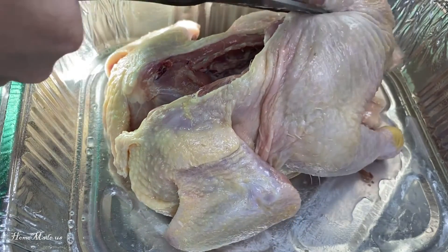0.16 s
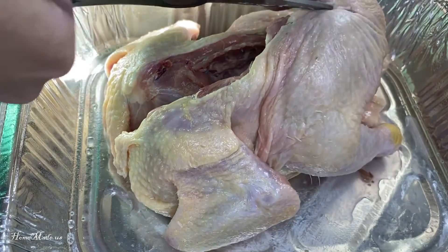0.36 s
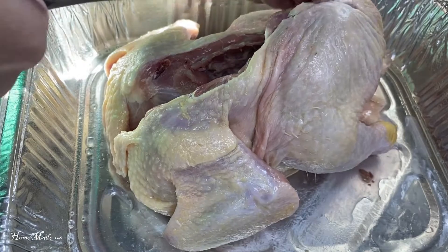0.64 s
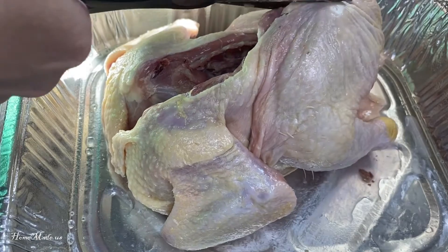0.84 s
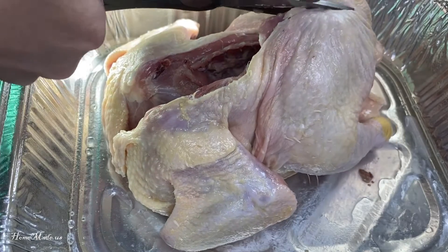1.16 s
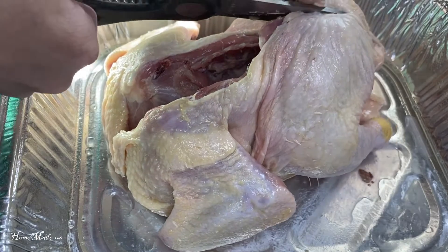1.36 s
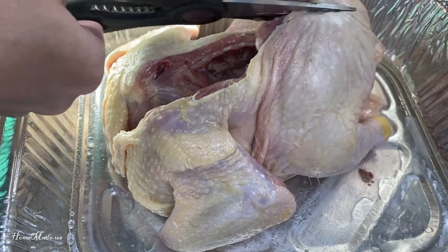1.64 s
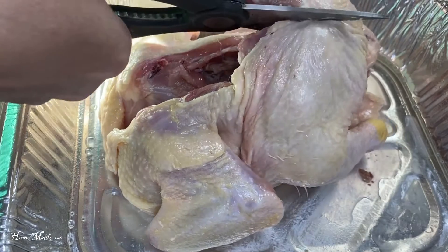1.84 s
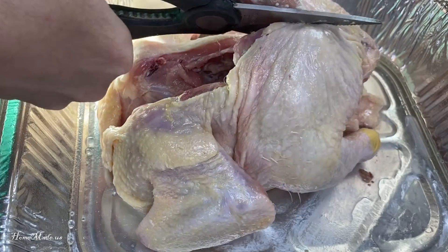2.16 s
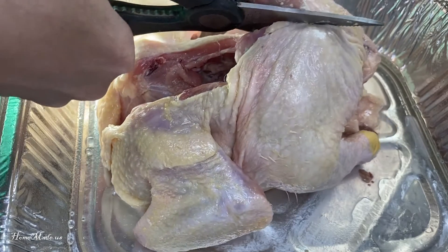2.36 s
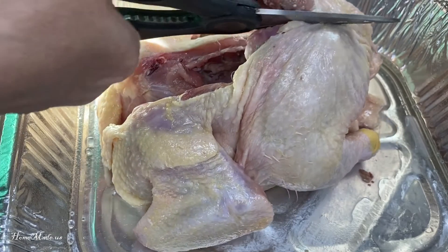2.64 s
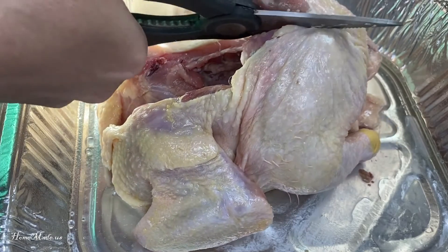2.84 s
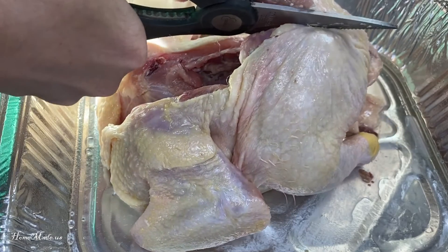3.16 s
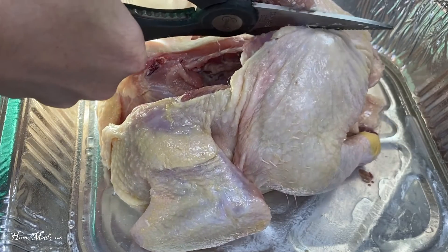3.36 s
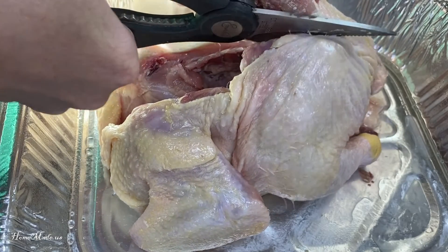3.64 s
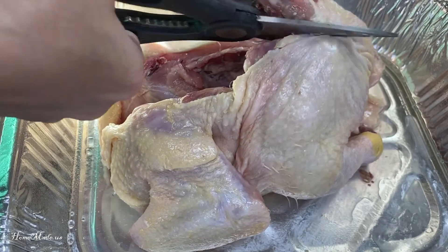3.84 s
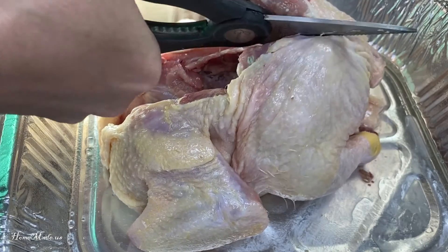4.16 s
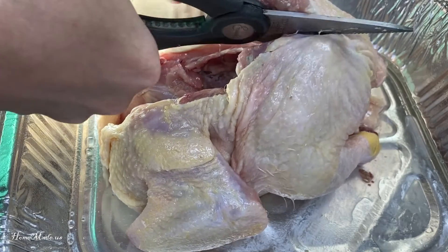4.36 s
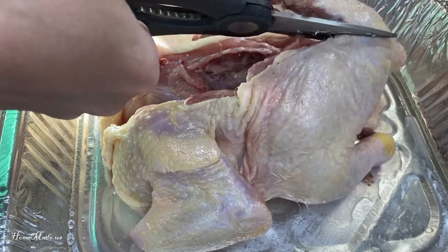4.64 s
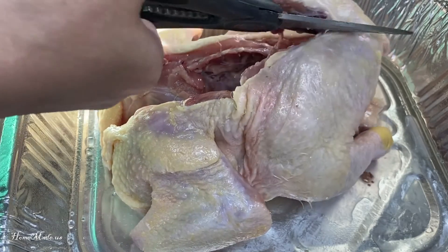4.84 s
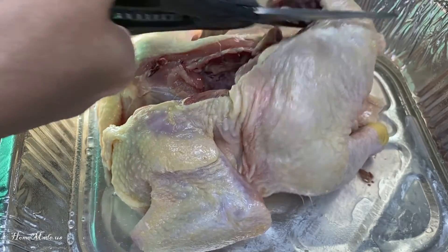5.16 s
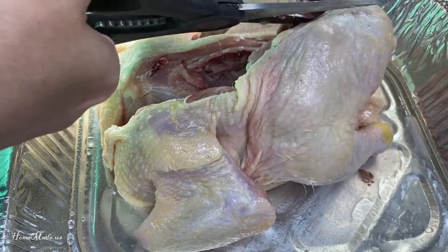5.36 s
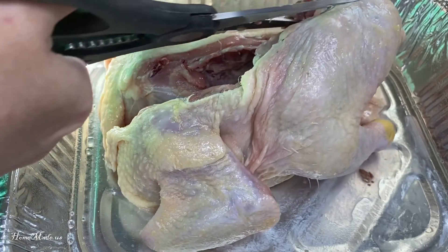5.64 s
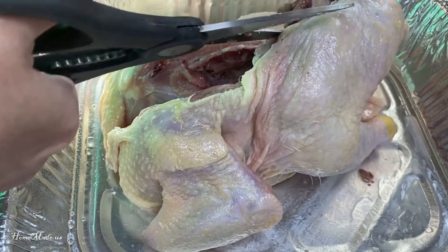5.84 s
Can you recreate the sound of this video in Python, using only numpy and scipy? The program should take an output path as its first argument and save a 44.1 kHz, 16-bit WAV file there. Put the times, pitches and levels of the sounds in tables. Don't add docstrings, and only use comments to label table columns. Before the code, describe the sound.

Close wet cutting of raw poultry with small clicks and crunches, three bone snaps, the last strongest with a thump, over low refrigerator hum.

```python
import sys
import numpy as np
from scipy import signal
from scipy.fft import rfft, irfft
from scipy.io import wavfile
from scipy.ndimage import uniform_filter1d

SR = 44100
rng = np.random.default_rng(int(sys.argv[2]) if len(sys.argv) > 2 else 0)


def convert_level_to_amplitude(level_db):
    exponent = np.asarray(level_db, float) / 20
    return 10 ** exponent


def transcribe(signal):
    frames = np.atleast_2d(signal).T
    limited = np.clip(frames, -1, 1)
    pcm = np.round(limited * 32767).astype(np.int16)
    wavfile.write(sys.argv[1], SR, pcm)


N = 264159

# hardest push t/s, ring level/dB, 20 dB rise/s, 20 dB fall/s, bright share/dB
SQUEEZES = [(0.0, -73.5, .05, 0.2, -3), (.2, -63.5, .065, 0.13, 1), (.314, -54.5, 0.08, 0.05, -3),
            (.5, -74, 0, 0.22, -4), (1.023, -82, .1, -0.2, 2), (1.122, -86.5, .03, .5, 3),
            (1.357, -70, 0.1, 0.19, -3), (1.767, -63.5, 0.05, 0.19, 1), (2.15, -82, 0.4, -0.14, 2),
            (2.514, -77, -0.06, 0.9, -3), (2.679, -73.5, 0.06, 0.22, -1), (2.903, -81, -0.1, .5, -1.5),
            (3.263, -78, 0, 0.3, -2), (3.432, -62.5, 0, 0.13, 0.5), (3.697, -79, .04, 0, 6.5),
            (3.996, -70.5, 0.1, 0.17, 1.5), (4.245, -58, 0.1, 0.21, -1.5), (4.44, -58.5, .035, 0.14, -0.5),
            (4.654, -64, 0.33, .1, -4.5), (4.879, -70, 0.05, -0.03, -4), (4.984, -73.5, 0.3, .18, -4),
            (5.078, -76, 0.5, 0.4, -2), (5.287, -65.5, 0.1, 0.1, -4), (5.55, -76, 1.2, .15, -4)]
# t/s, ring level/dB, dull share/dB
SINEW_RINGS = [(.0738, -63, -7), (.321, -52.5, -2), (0.8353, -62.5, -11), (1.3493, -50, -32),
               (1.382, -59, -15), (2.157, -63, -3.5), (2.5452, -57, -7), (3.1597, -68, -9),
               (3.247, -51.5, -19), (3.2868, -60.5, -4), (3.3447, -54, -5), (3.3516, -55, -7),
               (3.412, -44, -5.5), (4.1907, -50.5, -5.5), (4.2312, -44, -10), (4.2608, -53, -14),
               (4.276, -62, -13), (4.45, -49, -21), (4.6075, -41.5, -5), (4.9614, -67, -5),
               (4.9766, -54, -9), (5.0593, -57, -25), (5.078, -50.5, -16), (5.1079, -58, -7),
               (5.2406, -50.5, -14), (5.3294, -54.5, -14), (5.3772, -53.5, -25), (5.4362, -53.5, -17),
               (5.456, -65, -4), (5.6068, -62, -10.5)]
# t/s, ring level/dB, dull share/dB
FAT_POPS = [(0.1854, -62, 11), (0.5649, -56.5, 0), (0.9033, -75.5, 14.5), (.9556, -73.5, 0),
            (1.315, -63, 3), (1.4642, -66, 4), (1.8556, -61, 7), (1.864, -73, 17), (2.3405, -85, 25),
            (2.4957, -67, 10), (2.5048, -60.5, 4), (2.524, -60.5, 7), (2.5776, -67, -6), (2.6522, -65.5, 8),
            (2.7948, -65.5, 10), (2.804, -67, 7), (2.8916, -60.5, 5), (2.9005, -54, 3.5), (3.018, -66, 8),
            (3.3125, -71, -1), (3.3731, -57.5, 1.2), (3.421, -56.5, 9), (3.948, -72, 20), (3.9578, -62, 6),
            (4.209, -58, 4), (4.4936, -59.5, 1.5), (4.6202, -46.5, 1.5), (4.9011, -72.5, 9.5),
            (5.3007, -58.5, 5), (5.391, -64, 1)]
# t/s, ring level/dB, bright share/dB
SKIN_CLICKS = [(0.3012, -56, -1), (.4283, -74.5, 9.5), (0.4998, -66, 11.5), (0.6803, -79, 12.5),
               (1.011, -69, 10), (1.3, -71.5, 11.5), (1.588, -69.5, 11), (1.749, -63, 4),
               (1.759, -64.5, 12), (1.767, -55, 7), (1.8247, -62, 6), (1.9137, -59, 6.5),
               (2.129, -71, 14.5), (2.5565, -73, 10), (2.565, -67, 5.5), (2.6639, -60, 6.5),
               (2.683, -52, 3), (3.2677, -66, 0), (3.4964, -65, 12), (3.6876, -60.5, 12), (3.7006, -68, 9),
               (3.7953, -75, 12), (4.2254, -56, 6), (4.3716, -53.5, 3), (4.3983, -61, 4),
               (4.4432, -52, 6.5), (4.533, -64, 4), (4.8727, -64.5, 6.5), (5.1525, -64, 4.5),
               (5.1778, -67, 12)]
# t/s, level/dB, t60/s, dull share/dB, bright share/dB
SPLINTERS = [(3.4483, -36, .03, 3, 2), (3.4522, -40, .02, 2, 4), (3.4546, -24, .015, 6, 4),
             (3.4571, -22, .015, 7, 4), (3.4592, -31, .015, 8, 5), (3.4622, -31, .008, 0, 5),
             (3.4676, -40, .04, 0, 3), (3.476, -44, .012, 0, 8), (3.489, -49, .05, 0, 8),
             (4.3267, -29, .013, -26, 0), (4.3297, -38, .012, -24, 2), (4.3325, -51, .05, -14, 2),
             (4.5605, -48, .05, 0, 0), (4.5627, -36, .03, 0, 0), (4.5643, -28, .02, -6, 0),
             (4.5652, -10.5, .012, -6, 0), (4.5675, -9, .012, -7, 0), (4.5702, -21, .02, -6, 2),
             (4.5733, -29, .02, -2, 0), (4.5748, -28, .012, -2, 0), (4.579, -43, .1, 3, 0),
             (4.594, -48, .2, 8, -3)]
# f/Hz, level/dB, t60/s
BLADE_MODES = [(5430, -5.5, 0.01), (6880, -2.5, 0.00597), (7130, 0.4, .008), (7895, -0.5, .006),
               (8600, -3, 0.02)]
# f/Hz, level/dB, t60/s
BONE_MODES = [(1750, -22.5, 0.012), (2933, -19, 0.0064), (3400, -18, 0.0036), (3830, -18.5, 0.005),
              (4790, -14.5, .005)]
# f/Hz, level/dB, t60/s
CHIP_MODES = [(9650, 1.5, .004), (11520, -8, .004), (13000, -18.5, .003), (14900, -15, .004)]
# t/s, peak level/dB, start f/Hz, end
# f/Hz, t60/s
THUDS = [(4.5655, -35.5, 900, 950, 0.047), (4.568, -27, 1170, 1155, 0.041),
         (4.5655, -33.5, 1400, 1350, 0.043), (3.456, -44, 1070, 1040, 0.04), (3.458, -42, 61, 47, 0.17),
         (4.5705, -26.5, 128, 64, 0.1), (4.566, -37, 500, 94, 0.0404), (4.577, -35.5, 59, 42, .3),
         (4.594, -35, 1100, 1000, 0.056), (4.594, -32, 760, 710, 0.046), (4.597, -31.5, 410, 390, 0.11),
         (4.605, -28.5, 210, 160, 0.07), (4.612, -34, 320, 200, 0.1), (4.6, -40, 390, 301, 0.08),
         (4.61, -48, 907, 760, 0.1027), (4.61, -45, 600, 520, 0.099)]
# t/s, peak level/dB, t60/s
CRUNCHES = [(.187, -54, 0.041), (.2, -51.5, 0.19), (0.3003, -42, 0.043), (0.309, -47, 0.079),
            (0.32, -45, 0.049), (0.334, -52, 0.06), (0.567, -44.5, 0.016), (1.758, -55.5, 0.31),
            (3.4572, -50, .02), (3.95, -56, 0.78), (4.5649, -23.5, 0.022), (4.593, -34.5, 0.072),
            (4.605, -47, 0.073)]
# f/Hz, t60/s
ROOM = [(100, 0.28), (1000, 0.26), (4000, 0.09), (16000, .12)]
# f/Hz, level/dB rms
HUM = [(120.0, -48), (240.0, -67)]
# f/Hz, width/Hz, level/dB rms
CASING = [(58.5, 11.7, -66.5), (82.7, 14, -58.5), (157.7, 4.28, -61.5), (204, 9.2, -72), (331, 13, -73),
          (407, 4, -75), (594, 10, -70.5), (653, 7.76, -73.5), (826, 4.9, -73), (1374, 5.1, -73),
          (1486, 8, -75)]
# f/Hz, level/dB per Hz
AIR = [(28, -49), (48, -14.5), (120, -8.5), (172, -15.5), (290, -18), (600, -20.5), (1010, -23.5),
       (1900, -23.5), (2650, -29), (2900, -36), (3400, -35.5), (5500, -40.5), (7300, -57), (11000, -55),
       (16500, -61.5)]
# f/Hz, likeness/-1..1 (values beyond are clipped)
LIKENESS = [(60, 1), (150, 0.13), (350, .5), (900, -0.55), (1700, -0.5), (2500, 1.3), (5000, -0.5),
            (16000, -1.5)]
# f/Hz, level/dB
LEAN = [(60, -1.2), (200, -.8), (500, -.6), (1500, -0.092), (3000, 1.5), (5800, 1.1), (6800, 2),
        (16000, -1.4)]
# f/Hz, phase/turns
PORT_TURNS = [(300, 0), (1200, -.14), (3500, -.09), (6400, 0), (7200, .03), (8900, .5), (11200, 1.0),
              (13300, 1.5), (15000, 1.97), (20000, 2.0)]


def read(points, hz):
    f, value = np.transpose(points)
    return np.interp(np.log(hz + 1), np.log(f + 1), value)


def evened(x):
    return x / np.sqrt(np.mean(x ** 2) + 1e-20)


def add(mix, s, sound):
    part = mix[..., round(s * SR):][..., :sound.shape[-1]]
    part += sound[..., :part.shape[-1]]


def band(x, lo_hz, hi_hz):
    sos = signal.butter(2, [lo_hz, min(hi_hz, .49 * SR)], "band", fs=SR, output="sos")
    return signal.sosfilt(sos, x)


def burst(db, t60, noise):
    t = np.arange(noise.shape[-1]) / SR
    swell = 1 - np.exp(-t / .0003)
    return convert_level_to_amplitude(db - 60 * t / max(t60, .002)) * swell * noise


def three_colours(ring, dull, bright):
    ring = band(band(ring, 6300, 8900), 6300, 8900)
    dull = band(dull, 2400, 5800)
    bright = band(bright, 8600, 13800)
    return convert_level_to_amplitude(2.0) * ring + convert_level_to_amplitude(6.0) * dull + convert_level_to_amplitude(4.0) * bright


def pressure():
    rest_db, dull_rest_db = -95.5, -81.5
    dull_follows = 0.47
    s, db, rise_s, fall_s, bright_db = np.transpose(SQUEEZES)[..., None]
    late = np.arange(0, N + 64, 64) / SR - s
    rising = -late / np.maximum(rise_s, .01)
    falling = late / np.maximum(fall_s, .01)
    push_db = db - 20 * np.where(late < 0, rising, falling)
    ring_db = 20 * np.log10(convert_level_to_amplitude(rest_db) + convert_level_to_amplitude(push_db).max(0))
    thin_db = 20 * np.log10(convert_level_to_amplitude(rest_db) + convert_level_to_amplitude(push_db + bright_db).max(0))
    dull_db = dull_rest_db + dull_follows * (ring_db - rest_db)
    return [np.repeat(c, 64)[:N] for c in (ring_db, dull_db, thin_db)]


def fizz():
    films_per_s = 6000
    levels_db = np.array(pressure()) + np.array([[1.], [-6.], [-3.]])
    clumps = evened(uniform_filter1d(rng.standard_normal(N), 160))
    size = convert_level_to_amplitude(3 * np.minimum(rng.exponential(1, (3, N)), 5) + 3.3 * clumps)
    sign = rng.choice([-1., 1.], (3, N))
    grains = evened(size * sign * (rng.random((3, N)) < films_per_s / SR))
    return convert_level_to_amplitude(6.5) * three_colours(*(grains * convert_level_to_amplitude(levels_db)))


def ticks():
    rows = [(s, db, dull_db, -4 + 0.49 * dull_db) for s, db, dull_db in SINEW_RINGS]
    rows += [(s, db, dull_db, -4) for s, db, dull_db in FAT_POPS]
    rows += [(s, db, -8, bright_db) for s, db, bright_db in SKIN_CLICKS]
    drive = np.zeros((3, N))
    noise = rng.standard_normal((len(rows), 3, 1500))
    for (s, db, dull_db, bright_db), n in zip(rows, noise):
        t60 = .012 * convert_level_to_amplitude(0.17 * (db + max(bright_db, 0) + 64.5))
        shares = convert_level_to_amplitude(np.array([[0], [dull_db - 9], [bright_db - 4]]))
        add(drive, s, burst(db, t60, n) * shares)
    return convert_level_to_amplitude(13.0) * three_colours(*drive)


def shaken(drive, modes, lowest_hz):
    t = np.arange(3000) / SR
    body = sum(convert_level_to_amplitude(db - 60 * t / t60) * np.sin(2 * np.pi * hz * t) for hz, db, t60 in modes)
    sound = signal.oaconvolve(drive, body)[:N]
    return band(band(sound, lowest_hz, 20000), lowest_hz, 20000)


def snaps():
    drive = np.zeros((3, N))
    noise = rng.standard_normal((len(SPLINTERS), 2600))
    for (s, db, t60, dull_db, bright_db), n in zip(SPLINTERS, noise):
        add(drive, s, burst(db, t60, n) * convert_level_to_amplitude(np.array([[0], [dull_db], [bright_db]])))
    blades = shaken(drive[0], BLADE_MODES, 3004)
    bone = shaken(drive[1], BONE_MODES, 885)
    chips = shaken(drive[2], CHIP_MODES, 4900)
    return convert_level_to_amplitude(-16.5) * (blades - bone + chips)


def thuds():
    out, t = np.zeros(N), np.arange(9000) / SR
    for s, db, start_hz, end_hz, t60 in THUDS:
        hz = end_hz + (start_hz - end_hz) * np.exp(-t / (0.23 * t60))
        swell = 1 - np.exp(-t * hz / 0.45)
        tone = np.sin(2 * np.pi * np.cumsum(hz) / SR)
        add(out, s, convert_level_to_amplitude(db - 60 * t / t60) * swell * tone)
    return out


def crunch():
    drive = np.zeros(N)
    noise = rng.standard_normal((len(CRUNCHES), 5000))
    for (s, db, t60), n in zip(CRUNCHES, noise):
        add(drive, s, burst(db, t60, n))
    return convert_level_to_amplitude(5.0) * band(drive, 600, 2800)


def kitchen(x):
    taps = np.zeros((2, SR // 2))
    slots = np.arange(120, SR // 2 - 20, 20)
    at = slots + rng.integers(0, 20, (2, len(slots)))
    np.put_along_axis(taps, at, rng.choice([-1., 1.], at.shape), 1)
    hz, t, z = signal.stft(taps, SR, nperseg=256)
    decay = convert_level_to_amplitude(-60 * t / np.maximum(read(ROOM, hz), .03)[:, None])
    tail = signal.istft(z * decay, SR, nperseg=256)[1]
    return signal.fftconvolve(x[None], tail / np.linalg.norm(tail[0]), axes=1)[:, :N]


def fridge():
    t = np.arange(N) / SR
    hum = sum(np.sqrt(2) * convert_level_to_amplitude(db) * np.sin(2 * np.pi * (hz * t + rng.random())) for hz, db in HUM)
    out = hum * np.ones((2, 1))
    for hz, width_hz, db in CASING:
        r = np.exp(-np.pi * width_hz / SR)
        same = np.clip(read(LIKENESS, hz), -1, 1)
        sway = signal.lfilter([1], [1, -r], rng.standard_normal((2, 2, N)))
        waver = 0.93 + evened(sway[0]) + 1j * evened(sway[1])
        a, b = (np.exp(2j * np.pi * hz * t) * waver).real
        out += convert_level_to_amplitude(db) * evened(np.array([a, same * a + np.sqrt(1 - same ** 2) * b]))
    return out


def air():
    frames, hz = N // 512 + 6, np.fft.rfftfreq(2048, 1 / SR)
    a, b, c, d, patches = rng.standard_normal((frames, 1025, 5)).T
    patches = evened(uniform_filter1d(uniform_filter1d(patches, 20, 0), 8, 1))
    same = np.clip(read(LIKENESS, hz), -1, 1)[:, None]
    left, other = a + 1j * b, c + 1j * d
    z = np.array([left, same * left + np.sqrt(1 - same ** 2) * other])
    z *= convert_level_to_amplitude(read(AIR, hz)[:, None] + 1.3 * patches)
    sound = signal.istft(z, nperseg=2048, noverlap=1536)[1][:, 1024:N + 1024]
    return convert_level_to_amplitude(-58.5) * evened(sound)


def scene():
    cutting = fizz() + ticks() + snaps() + thuds() + crunch()
    close = cutting * convert_level_to_amplitude(np.array([[1.2], [-1.2]]))
    return close + convert_level_to_amplitude(-13.5) * kitchen(cutting) + fridge() + air()


def two_sides(dry):
    shared, shared_above_hz, edge_hz = .95, 6000, 15800
    hz = np.fft.rfftfreq(N, 1 / SR)
    left, right = rfft(dry) * convert_level_to_amplitude(-np.clip((hz - edge_hz) / 25., 0, 40))
    share = shared / (1 + (shared_above_hz / (hz + 1)) ** 16)
    right = share * left + (1 - share) * right
    f, turns = np.transpose(PORT_TURNS)
    half = np.exp(1j * np.pi * np.interp(hz, f, turns)) / convert_level_to_amplitude(read(LEAN, hz) / 2)
    return irfft(np.array([left / half, right * half]), N)


def emptied(x):
    masked_db, loud_db, faint_db = -9.5, -98, -115
    mid_side = np.array([x[0] + x[1], x[0] - x[1]]) / 2
    z = signal.stft(mid_side, nperseg=1024, noverlap=768)[2][:, :512]
    power = (abs(z) ** 2).reshape(2, 32, 16, -1).mean(2)
    power_db = 10 * np.log10(uniform_filter1d(power, size=4, axis=2) + 1e-20)
    heard = (power_db > power_db[::-1] + masked_db) | (power_db > loud_db)
    keep = heard & (power_db > faint_db)
    keep[:, :5] = True
    z = np.pad(z * np.repeat(keep, 16, axis=1), ((0, 0), (0, 1), (0, 0)))
    mid, side = signal.istft(z, nperseg=1024, noverlap=768)[1][:, :N]
    return np.array([mid + side, mid - side])


def top_cut(x):
    return signal.sosfilt(signal.butter(12, 17030, fs=SR, output="sos"), x)


def record(dry):
    mix = emptied(two_sides(dry))
    return top_cut(mix)


dry = scene()
out = record(dry)
transcribe(out)
```